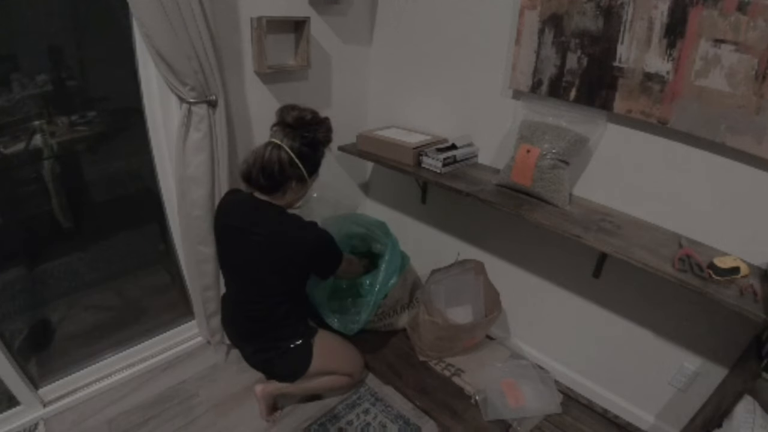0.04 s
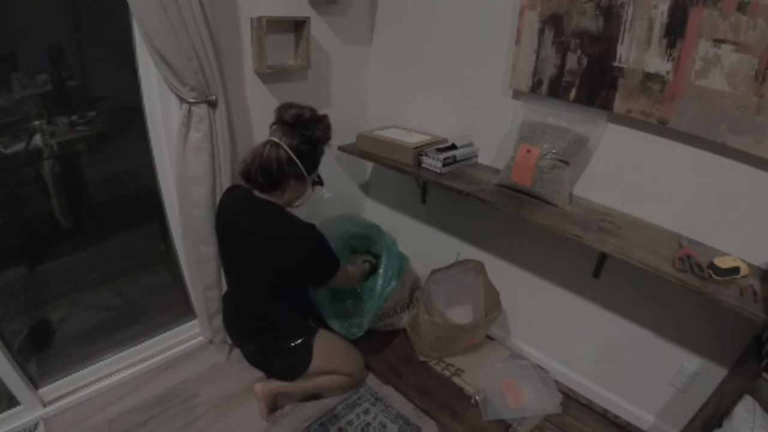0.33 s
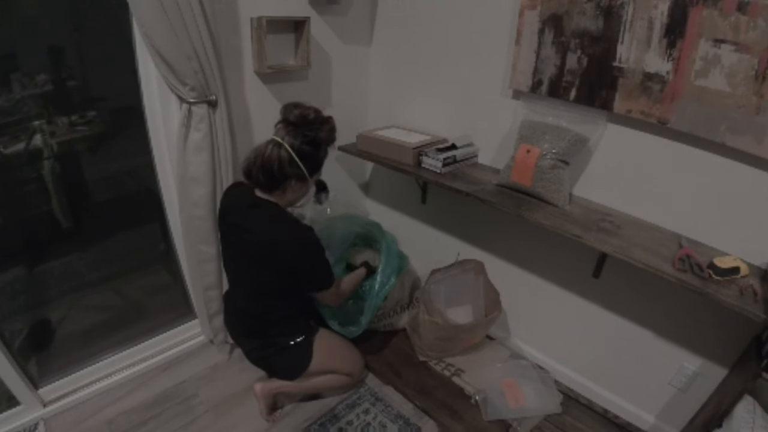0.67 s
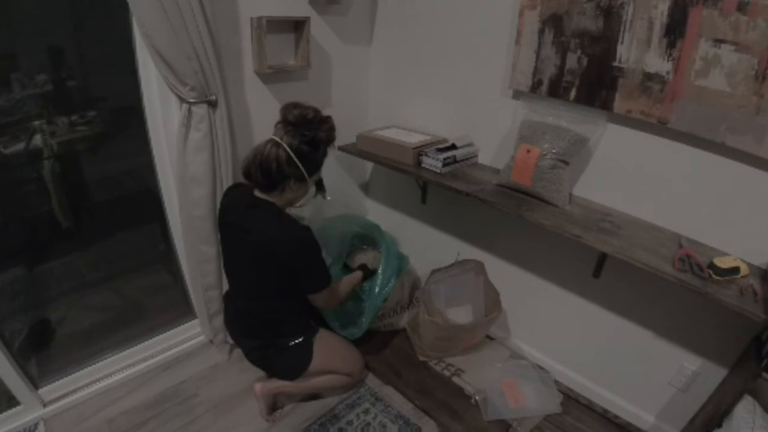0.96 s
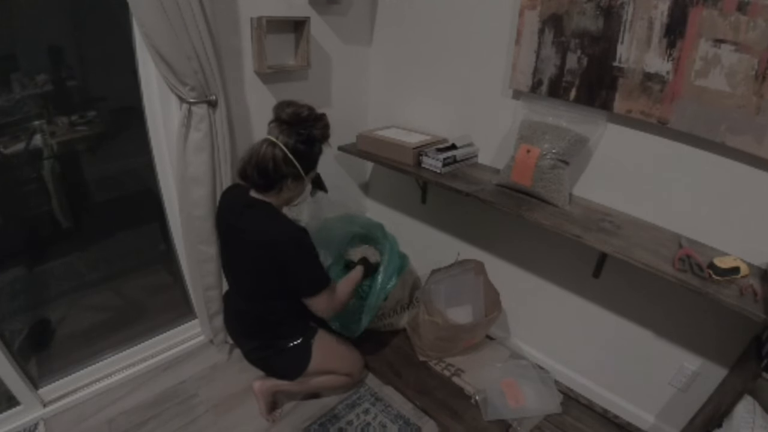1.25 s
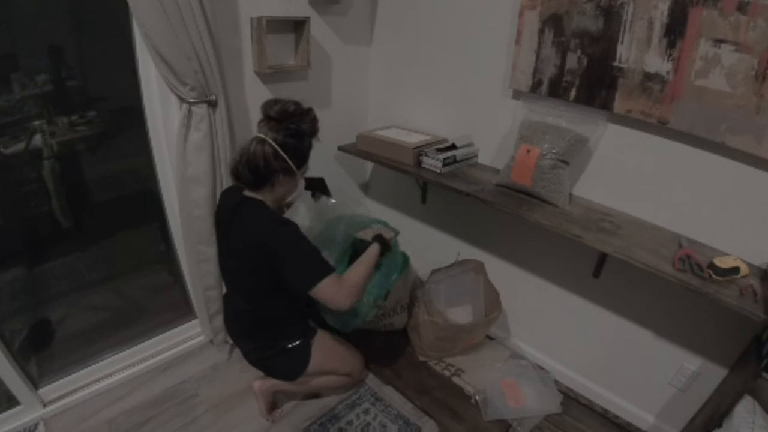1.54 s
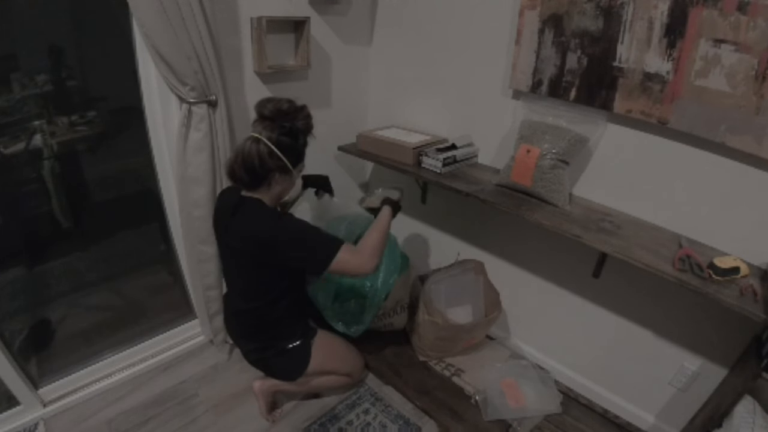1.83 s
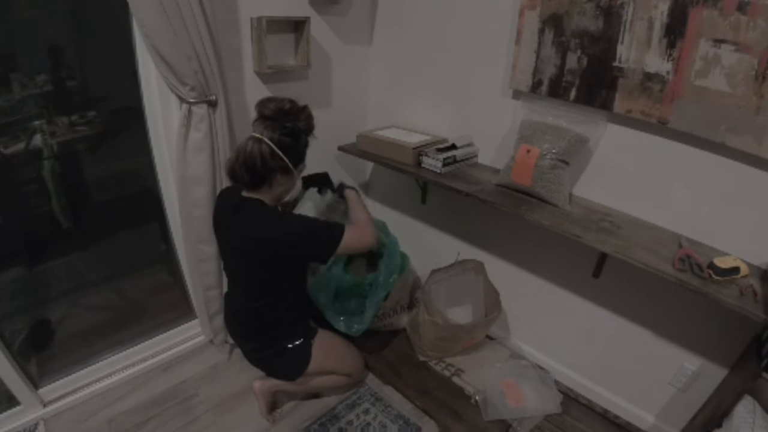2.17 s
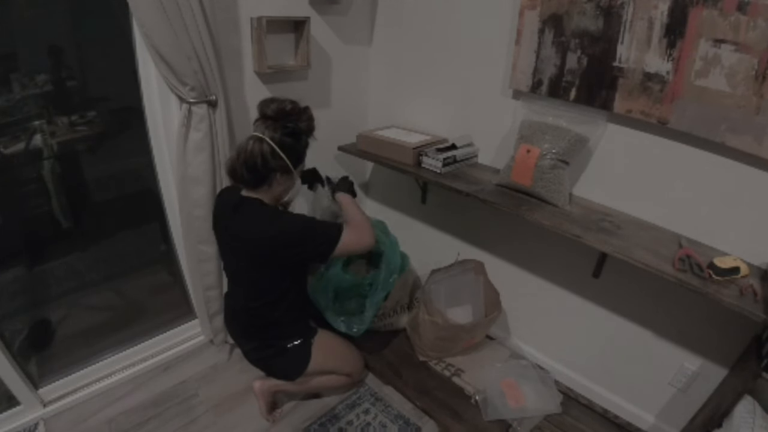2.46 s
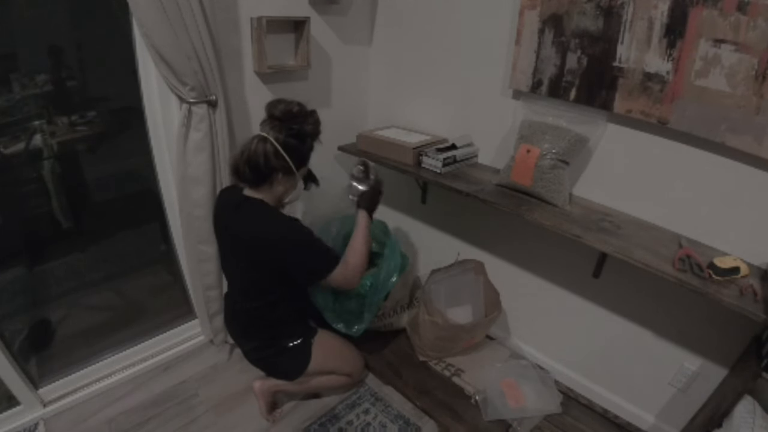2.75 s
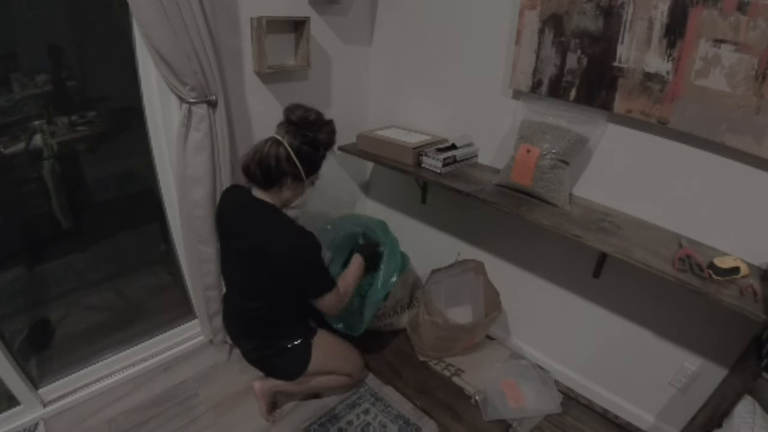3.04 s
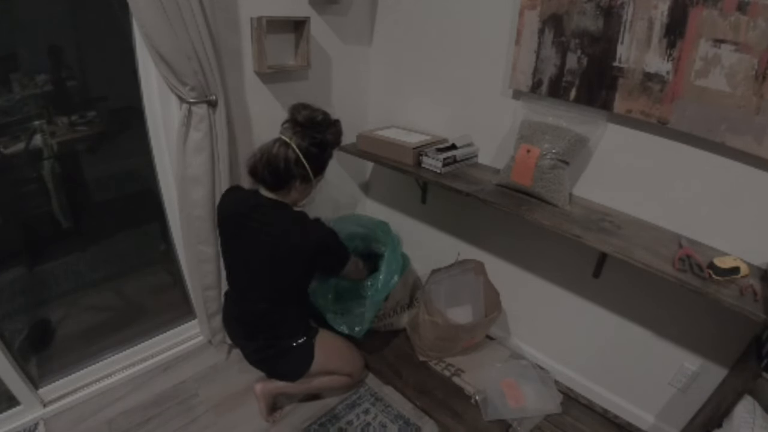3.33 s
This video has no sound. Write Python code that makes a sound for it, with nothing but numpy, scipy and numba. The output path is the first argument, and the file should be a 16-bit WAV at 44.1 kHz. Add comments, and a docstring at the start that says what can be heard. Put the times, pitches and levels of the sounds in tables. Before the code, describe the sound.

Dry beans are scooped and poured close by in a small, quiet room. From 0.2 to 1.5 seconds a metal scoop digs into a sack, with crunching, bright ticking and chinks on its rim. Loose beans click with a faint rustle until about 2 seconds. From 2.4 they hiss off the scoop and drum into a crackling plastic bag, fullest around 3, with single drops until 3.5.

```python
"""Scooping coffee beans into a bag

A small, quiet room, one microphone close by. A metal scoop pushes into a plastic-lined sack: beans
tick, crunch and chink on its rim, and loose ones click inside as it rises. Then it tips: the beans
hiss off the metal and drum in a hand-held plastic bag, a few falling singly before and after."""
import sys
import numpy as np
from scipy import signal
from scipy.fft import rfft, irfft, next_fast_len
from scipy.io import wavfile
from scipy.ndimage import uniform_filter1d
from numba import njit

SR = 44100
rng = np.random.default_rng(int(sys.argv[2]) if len(sys.argv) > 2 else 0)


def dump_mix(stems):
    """Bounce the given channels to the path in sys.argv[1] as a 16-bit WAV at rate SR."""
    frames = np.atleast_2d(stems).T  # one column per channel
    limited = np.clip(frames, -1, 1)  # hard clip at full scale
    pcm = np.round(limited * 32767).astype(np.int16)
    wavfile.write(sys.argv[1], SR, pcm)


N = 158760
HIT_DELAY_S = .0015  # each click, chink and drop sounds 1.5 ms after its listed time


def amp(db):
    """Decibels to gain."""
    return 10 ** (np.asarray(db) / 20)


def unit(x):
    """Scale to rms 1."""
    return x / np.sqrt(np.mean(x ** 2) + 1e-20)


def along(points, hz):
    """Read (Hz, value) points on a log frequency axis."""
    point_hz, values = np.transpose(points)
    return np.interp(np.log(hz + 1), np.log(point_hz + 1), values)


def gains(rows):
    """One gain curve for each dB column, fading quickly outside the rows."""
    times, *levels = np.transpose(rows)
    t = np.arange(N) / SR
    gate = np.clip(np.minimum(t - times[0], times[-1] - t) / .01 + .5, 0, 1)
    return [gate * amp(np.interp(t, times, db)) for db in levels]


def colour(x, spectrum):
    """Minimum-phase filter with the given spectrum, floored at -70 dB."""
    size = 2 * next_fast_len(len(x) // 2 + 2048)
    gain_db = np.maximum(along(spectrum, np.fft.rfftfreq(size, 1 / SR)), -70)
    cepstrum = irfft(np.log(amp(gain_db)))
    cepstrum[1:size // 2] *= 2
    cepstrum[size // 2 + 1:] = 0
    return irfft(rfft(x, size) * np.exp(rfft(cepstrum)), size)[:len(x)]


def add(track, start_s, sound):
    """Mix a sound in at its start time."""
    part = track[max(round(start_s * SR), 0):][:len(sound)]
    part += sound[:len(part)]


def contacts(spectrum, rate, spread_db, t60, kinds=12):
    """Random bean contacts at a mean rate per second, rms 1; each kind has its own brief ring."""
    t, out = np.arange(SR // 40) / SR, np.zeros(N)
    for _ in range(kinds):
        sizes = amp(spread_db * np.clip(rng.standard_normal(N), -2, 2)) * rng.choice([-1, 1], N)
        hits = sizes * (rng.random(N) < rate / kinds / SR)
        response = unit(rng.standard_normal(len(t)) * amp(-60 * t / t60))
        out += signal.oaconvolve(hits, response)[:N]
    return unit(colour(out, spectrum))


def blow(spectrum, t60, scatter):
    """One contact of peak 1: a sharp push followed by a short chatter."""
    t = np.arange(SR // 10) / SR
    chatter = rng.standard_normal(len(t)) * amp(-60 * t / t60)
    hit = colour((t == 0) + scatter * chatter / np.linalg.norm(chatter), spectrum)
    return hit / np.abs(hit).max()


def ring(hz, cycles):
    """A sine that builds within a cycle and falls 60 dB over the given cycles."""
    phase = hz * np.arange(SR // 10) / SR
    return np.sin(2 * np.pi * phase) * (1 - np.exp(-2 * phase)) ** 2 * amp(-60 * phase / cycles)


@njit
def band_pass(x, tuning, damping):
    """State-variable resonator with a tuning per sample."""
    y, band, low = np.zeros(len(x)), 0., 0.
    for i in range(len(x)):
        g = tuning[i]
        high = (x[i] - (damping + g) * band - low) / (1 + g * (damping + g))
        y[i] = g * high + band
        band = y[i] + g * high
        low += 2 * g * y[i]
    return y


def resonate(x, rows, q):
    """A resonance gliding along (s, Hz) rows, rms 1."""
    times, pitches = np.transpose(rows)[:2]
    hz = np.interp(np.arange(N) / SR, times, pitches)
    return unit(band_pass(x, np.tan(np.pi * hz / SR), 1 / q))


def rearranging(ticks, depth_db):
    """As the beans rearrange, the colour of their ticking drifts in patches."""
    bands = signal.stft(ticks, nperseg=256)[2]
    patches = uniform_filter1d(rng.standard_normal(bands.shape), size=5, axis=0)
    patches = unit(uniform_filter1d(patches, size=14, axis=1))
    return unit(signal.istft(bands * amp(depth_db * patches), nperseg=256)[1][:N])


# Room tone at the microphone: frequency_hz, gain_db
AIR_SPECTRUM = [(15, -81), (25, -23), (263, -5), (463, -7.5), (591, -6), (659, -20), (962, -11),
                (1190, -21), (1560, -20), (11900, -33), (16000, -30)]


def room_tone(level_db=-57.5):
    """Still air: a faint, steady, low noise."""
    return amp(level_db) * unit(colour(rng.standard_normal(N), AIR_SPECTRUM))


# The scoop's three strokes, in relative levels: time_s, tick_db, crunch_db, rumble_db
PUSH_LEVELS = [(0.0, -57, -49, -45), (0.026, -61, -63.5, -62), (0.092, -38.5, -40.5, -46),
               (0.156, -42.5, -40, -37.5), (0.19, -42.5, -35, -43), (0.2, -19.5, -31, -44),
               (0.296, -22.5, -31, -38.5), (0.354, -18.5, -30, -32.5), (0.45, -22, -32, -40),
               (0.516, -25.5, -36, -39), (0.53, -29, -35.5, -37.5), (0.748, -22.5, -33, -42),
               (0.874, -25.5, -36.5, -43), (0.936, -24.5, -37.5, -39), (1.034, -27, -39, -43.5),
               (1.06, -30, -39, -43), (1.078, -24.5, -38, -42), (1.11, -41, -38.5, -50)]
LIFT_LEVELS = [(1.1, -41, -38, -37), (1.12, -45, -51, -44), (1.128, -25, -36.5, -43),
               (1.174, -37.5, -42.5, -49.5), (1.22, -30, -31.5, -42.5), (1.25, -37, -40, -47),
               (1.286, -27, -37.5, -48), (1.302, -35.5, -38, -46), (1.332, -22.5, -30, -49.5),
               (1.42, -31.5, -39.5, -48), (1.456, -23.5, -28, -44.5), (1.484, -30.5, -48.5, -44.5),
               (1.492, -38.5, -38.5, -44.5), (1.6, -53, -51, -47.5)]
CARRY_LEVELS = [(1.59, -65, -51, -51), (1.742, -49.5, -48.5, -48), (1.878, -54, -42.5, -50.5),
                (1.956, -49, -44, -50.5), (2.108, -52, -54, -53), (2.168, -72, -61.5, -65),
                (2.34, -73, -87, -65)]
# Spectra of each stroke's ticks and crunch, and of the sack: frequency_hz, gain_db
PUSH_TICKS = [(3240, -31), (5500, -4), (6900, 5.5), (7700, -0.5), (9950, 3), (13100, 1.5), (14600, -5),
              (15600, -12)]
LIFT_TICKS = [(3410, -20), (5800, -87), (6160, -34), (6670, 1), (7170, -1), (7740, -1.5), (9020, -3.5),
              (9780, 2), (13200, -6), (14900, -14), (16000, -51)]
LOOSE_TICKS = [(2650, -20), (4500, 2.5), (5180, 0), (6890, -1), (8100, 0.5), (12400, -1), (15600, -9.5)]
PUSH_CRUNCH = [(820, -35), (1400, 1), (1750, 0), (2060, -2.5), (2280, -2.5), (2660, 1), (3370, -3),
               (3740, 0.5), (5240, 1), (6200, -4), (8060, -34), (13600, -120)]
LIFT_CRUNCH = [(880, -36), (1500, -7.5), (2120, -16), (2400, -8), (3320, -8.5), (4920, -3), (6200, -15),
               (8060, -37), (13600, -120)]
CARRY_RUSTLE = [(470, -27), (800, -10), (873, -18), (1040, 6), (1660, 3.5), (2310, -0.5), (2570, 2.5),
                (6500, -7.5), (8450, -41), (14300, -120)]
SACK_RUMBLE = [(35, -82), (60, -53), (112, -15.5), (268, -2), (338, -6), (447, -5.5), (481, -3), (773, -6),
               (928, -7.5), (1010, -10.5), (1100, -6.5), (1430, -20.5), (2420, -120)]
# Centre of the brightest ticks: time_s, pitch_hz
TICK_GLINT = [(0.2, 9570), (0.478, 8500), (0.652, 10100), (1.17, 9600), (1.202, 7980), (1.282, 9890),
              (1.354, 8200), (1.474, 8270), (1.5, 9010)]


def digging():
    """Beans tick against each other and the scoop, crunch under it and rumble in the sack."""
    out = np.zeros(N)
    strokes = [(PUSH_LEVELS, PUSH_TICKS, PUSH_CRUNCH, 2000),
               (LIFT_LEVELS, LIFT_TICKS, LIFT_CRUNCH, 1500),
               (CARRY_LEVELS, LOOSE_TICKS, CARRY_RUSTLE, 1200)]
    for levels, tick_spectrum, crunch_spectrum, rate in strokes:
        tick_gain, crunch_gain, rumble_gain = gains(levels)
        ticks = contacts(tick_spectrum, rate, spread_db=3, t60=.009)
        crunch = contacts(crunch_spectrum, rate, spread_db=3.5, t60=.008, kinds=8)
        glint = 1.4 * resonate(ticks, TICK_GLINT, q=1.64)
        ticks = rearranging(ticks + glint, depth_db=1.5)
        rumble = contacts(SACK_RUMBLE, rate=1300, spread_db=2.5, t60=.0052, kinds=8)
        out += amp(-1.5) * tick_gain * ticks
        out += amp(-.5) * crunch_gain * crunch
        out += amp(2.5) * rumble_gain * rumble
    return out


# The scoop's two hollow notes, rising as it fills: time_s, pitch_hz, level_db
LOWER_CAVITY = [(.09, 370, -44), (.15, 420, -44.5), (.22, 500, -35.5), (.28, 520, -34), (.38, 560, -37),
                (.5, 600, -42)]
UPPER_CAVITY = [(.09, 1080, -56), (.35, 1120, -48.5), (.62, 1170, -40), (.95, 1260, -43.5),
                (1.48, 1550, -57)]


def scoop_cavity():
    """Beans entering the scoop excite two resonances of its cavity."""
    out = np.zeros(N)
    scrape_spectrum = [(100, -20), (400, 0), (1500, 0), (5000, -20)]
    for note in (LOWER_CAVITY, UPPER_CAVITY):
        gain = gains([(time_s, db) for time_s, _, db in note])[0]
        scrape = contacts(scrape_spectrum, rate=2500, spread_db=1.5, t60=.002, kinds=6)
        out += gain * resonate(resonate(scrape, note, q=7), note, q=4)
    return out


# Single beans in the scoop, in relative levels: start_s, knock_db, treble_db, pitch_hz
BEAN_CLICKS = [(0.097, -16.5, -44, 507), (0.127, -21, -33.5, 505), (0.162, -16.5, -28.5, 1150),
               (0.203, -16, -19.5, 495), (1.062, -14, -42, 1230), (1.13, -24, -26.5, 3880),
               (1.19, -27, -27, 4420), (1.204, -28, -28, 4410), (1.215, -17.5, -23, 587),
               (1.228, -30, -28, 3840), (1.358, -20, -23.5, 3730), (1.406, -20, -23.5, 3870),
               (1.446, -23, -27, 3870), (1.514, -23, -34, 880), (1.562, -25, -34, 3870),
               (1.619, -25.5, -42.5, 560), (1.645, -40, -67, 770), (1.655, -28.5, -55.5, 2800),
               (1.73, -22, -41, 2350), (1.745, -17.5, -38, 670), (1.779, -27, -59, 982),
               (1.797, -15, -30, 3770), (1.8, -16, -33, 2270), (1.805, -17.5, -43, 700),
               (1.822, -17.5, -24.5, 800), (1.835, -19, -47, 860), (1.84, -17, -47.5, 3070),
               (1.86, -22, -41, 778), (1.9, -16.5, -35.5, 1550), (1.92, -14.5, -29, 3170),
               (1.941, -17.5, -43, 2970), (1.972, -14, -34.5, 2270), (1.986, -16, -42.5, 2950),
               (2.017, -19, -33.5, 1000), (2.183, -35.5, -62, 534), (2.41, -23, -38.5, 643),
               (2.507, -21, -37, 3670), (2.54, -32, -24, 4500), (2.549, -25, -23.5, 750)]
# A bean's knock on the metal: frequency_hz, gain_db
KNOCK_SPECTRUM = [(120, -23), (200, -6.5), (435, -11), (466, -18.5), (757, -7), (870, -9), (1650, -11.5),
                  (3030, -5.5), (3480, -7), (5500, -14), (7150, -10), (12100, -120)]


def scoop_clicks():
    """Loose beans hop in the scoop: a dry knock with a bright top."""
    out = np.zeros(N)
    for start_s, knock_db, treble_db, pitch_hz in BEAN_CLICKS:
        knock = blow(KNOCK_SPECTRUM, t60=.014, scatter=2.04) + .47 * ring(pitch_hz, cycles=25.6)
        treble = blow(LOOSE_TICKS, t60=.029, scatter=2.33)
        add(out, start_s + HIT_DELAY_S, amp(knock_db - 4) * knock + amp(treble_db + 11.5) * treble)
    return out


# Beans striking the rim, in relative levels: start_s, level_db, pitch_hz
RIM_STRIKES = [(0.2264, -15, 8100), (0.2574, -25, 8620), (0.6704, -16, 11800), (0.7238, -16.5, 8600),
               (0.843, -11.5, 9770), (0.853, -6.5, 9850), (0.873, -12, 9690), (0.9066, -13.5, 9600),
               (0.9827, -12, 9660), (1.0074, -12.5, 9600), (1.0735, -15, 9500), (1.1248, -20, 9040),
               (1.2735, -13.5, 9550), (1.28, -16.5, 9460), (1.338, -13, 7460), (1.345, -26, 7250),
               (1.3624, -31, 9800), (1.3818, -18.5, 7250), (1.408, -18, 8050), (1.4507, -20, 7240),
               (2.6973, -14.5, 9040), (2.7214, -11, 10300)]


def rim_chinks(log_step=.039):
    """A bean chatters on the scoop's rim, which rings in a narrow high band."""
    out = np.zeros(N)
    # steps_from_pitch, gain_db
    peak_shape = [(-12, -60), (-3, -20), (-1, -8), (0, 0), (1, -8), (3, -20), (8, -40)]
    for start_s, level_db, pitch_hz in RIM_STRIKES:
        spectrum = [(pitch_hz * np.exp(steps * log_step), db) for steps, db in peak_shape]
        add(out, start_s + HIT_DELAY_S, amp(level_db - 3) * blow(spectrum, t60=.06, scatter=3))
    return out


# Beans and clumps landing in the bag, in relative levels: start_s, thud_db, crack_db, pitch_hz
LANDINGS = [(2.338, -42, -69, 228), (2.366, -14.5, -32.5, 970), (2.401, -27, -41, 645),
            (2.448, -20.5, -36, 603), (2.576, -14.5, -42, 895), (2.632, -9.5, -44, 1000),
            (2.647, -17.5, -31.5, 851), (2.666, -16, -31, 700), (2.735, -21, -40, 625),
            (3.153, -22, -30, 630), (3.187, -23.5, -42, 645), (3.221, -17, -39.5, 493),
            (3.244, -18.5, -39, 725), (3.248, -24, -40, 670), (3.29, -19, -52, 668),
            (3.321, -18.5, -29, 590), (3.328, -20.5, -57, 272), (3.386, -40, -69, 326),
            (3.458, -28, -51.5, 620)]
# The struck film's thud and crack: frequency_hz, gain_db
THUD_SPECTRUM = [(59, -61), (100, -16), (454, -4.5), (581, -2), (762, -1), (1070, -8), (1350, -14),
                 (2060, -33), (2200, -24), (2860, -42), (4840, -120)]
CRACK_SPECTRUM = [(1060, -37), (1800, 4.5), (2900, 5.5), (3560, 0.5), (4590, -0.5), (8740, -30),
                  (12000, -52), (15600, -62), (22000, -120)]


def bag_drops():
    """Single beans hit the bag: a hollow thud at the film's local pitch, and a crack."""
    out = np.zeros(N)
    for start_s, thud_db, crack_db, pitch_hz in LANDINGS:
        thud = blow(THUD_SPECTRUM, t60=.021, scatter=3) + 1.23 * ring(pitch_hz, cycles=14.8)
        crack = blow(CRACK_SPECTRUM, t60=.028, scatter=3)
        add(out, start_s + HIT_DELAY_S, amp(thud_db - 2) * thud + amp(crack_db + 9.5) * crack)
    return out


# The pour, close to the microphone, in relative levels: time_s, slide_db, crackle_db, patter_db
POUR_LEVELS = [(2.38, -59, -65, -52), (2.392, -72, -70, -53), (2.412, -42, -62, -50),
               (2.426, -54.5, -56, -45.5), (2.522, -38, -51.5, -55), (2.546, -29, -49, -39),
               (2.634, -33.5, -40, -36), (2.708, -28, -40, -38), (2.774, -27, -38, -32.5),
               (2.906, -26, -33, -27), (2.98, -30, -34.5, -25), (3.072, -28, -33.5, -26),
               (3.184, -42.5, -48, -34), (3.314, -54, -55.5, -49.5), (3.324, -43, -44, -34),
               (3.344, -60, -54, -47), (3.422, -60, -66, -48.5), (3.6, -70, -72, -66)]
# Spectra of the thin and the full stream, and of the bag under them: frequency_hz, gain_db
TRICKLE_HISS = [(1880, -54), (3200, -4.5), (3700, -7), (4950, -1.5), (5620, -4), (9860, -4), (12200, -9),
                (14500, -33)]
STREAM_HISS = [(1880, -20), (3200, -3), (5020, 2.5), (5710, -0.5), (7280, 1), (10900, 3), (12600, 1),
               (15100, -9), (16000, -22)]
BAG_DRUM = [(41, -83), (70, -51), (162, -15), (222, -13.5), (248, -9), (323, -4), (380, -9.5), (453, -10),
            (501, -3), (575, -8), (628, -2.5), (1080, -12.5), (1400, -23), (1820, -41), (3080, -120)]
BAG_CRACKLE = [(710, -26), (1200, -3.5), (1440, 0), (1870, -2.5), (2040, -1), (3310, -9.5), (3600, -12),
               (4680, -28), (7920, -120)]
# The film's note as it sags and is pulled taut: time_s, pitch_hz
FILM_PITCH = [(2.56, 676), (2.635, 970), (2.67, 740), (2.75, 560), (2.84, 862), (2.93, 590), (3.08, 646),
              (3.3, 650)]
# That note's level over the patter: time_s, level_db
FILM_RING = [(2.56, -3.5), (2.68, 7.5), (2.78, -1.5), (2.86, 4.5), (2.95, -3.5), (3.09, 1), (3.3, -11)]


def pouring():
    """Beans hiss off the scoop and drum on the slack film of the bag, sounding its note."""
    slide_gain, crackle_gain, patter_gain = gains(POUR_LEVELS)
    t = np.arange(N) / SR
    flow = np.interp(t, (2.58, 2.92), [0, 1])  # the hiss brightens as the stream builds
    trickle = contacts(TRICKLE_HISS, rate=2200, spread_db=6.5, t60=.013, kinds=8)
    stream = contacts(STREAM_HISS, rate=6200, spread_db=1.5, t60=.006, kinds=8)
    hiss = np.sqrt(1 - flow) * trickle + np.sqrt(flow) * stream
    drum = contacts(BAG_DRUM, rate=1600, spread_db=2, t60=.0036)
    thuds = contacts(THUD_SPECTRUM, rate=1400, spread_db=1.5, t60=.003, kinds=6)
    note_gain = amp(np.interp(t, *np.transpose(FILM_RING)))
    patter = amp(1) * drum + note_gain * resonate(thuds, FILM_PITCH, q=10)
    crackle = contacts(BAG_CRACKLE, rate=1300, spread_db=4, t60=.016)
    return slide_gain * hiss + amp(5) * crackle_gain * crackle + patter_gain * patter


# Decay of the small room: frequency_hz, t60_s
ROOM_DECAY = [(150, 1), (700, 0.2), (4000, 0.33), (14000, 0.24)]


def room_reverb(direct):
    """A short diffuse tail reaches the microphone 5 ms late; the bass lingers longest."""
    hz, t, bands = signal.stft(rng.standard_normal(SR // 2), SR, nperseg=256)
    decay = amp(-60 * t / along(ROOM_DECAY, hz)[:, None])
    tail = signal.istft(bands * decay, SR, nperseg=256)[1]
    tail = np.pad(tail, (SR // 200, 0))
    return signal.fftconvolve(direct, tail / np.linalg.norm(tail))[:N]


def scene(reverb_db=-14.5):
    """Scoop and bag at close range, in mono, with the room well behind them."""
    beans = digging() + scoop_cavity() + rim_chinks() + scoop_clicks() + pouring() + bag_drops()
    air = room_tone()
    return (beans + amp(reverb_db) * room_reverb(beans) + air)[None]


def record(dry, low_cut_hz=72, top_hz=15800):
    """The recorder thins the deep bass and keeps nothing above its band limit."""
    size = next_fast_len(N + SR // 2)
    hz = np.fft.rfftfreq(size, 1 / SR)
    low_cut = (1j * hz / (1j * hz + low_cut_hz)) ** 2
    return irfft(rfft(dry, size) * low_cut * (hz < top_hz), size)[:, :N]


dry = scene()
out = record(dry)
dump_mix(out)
```